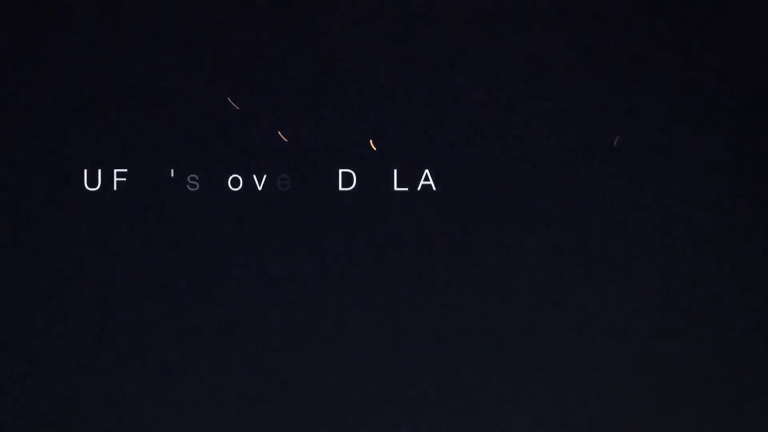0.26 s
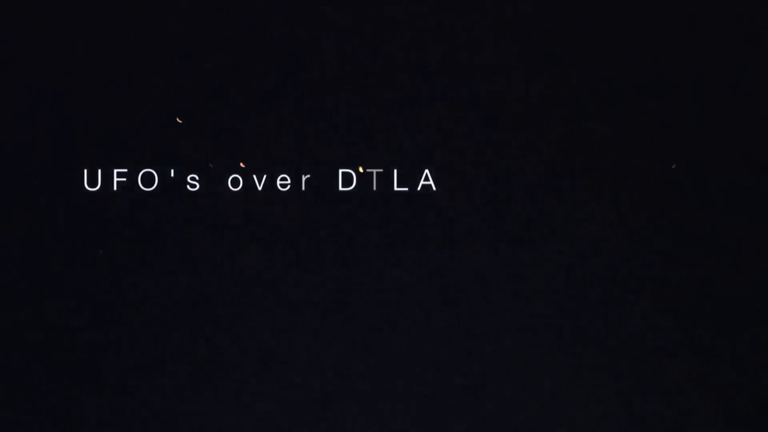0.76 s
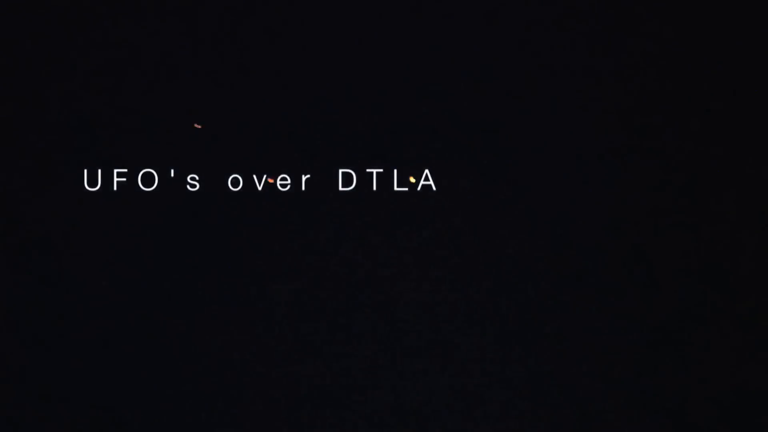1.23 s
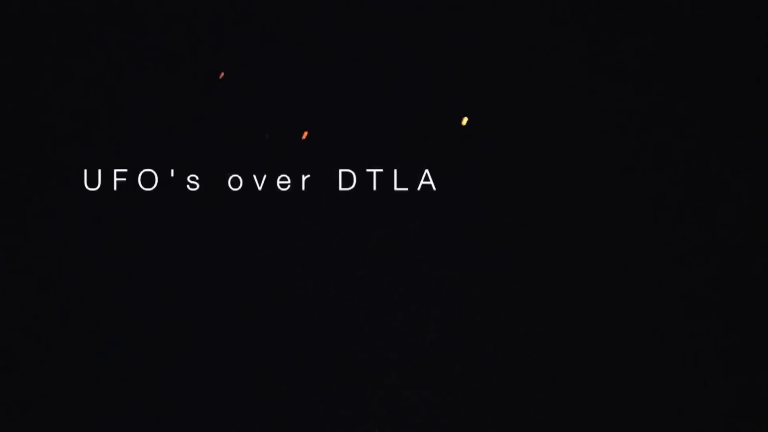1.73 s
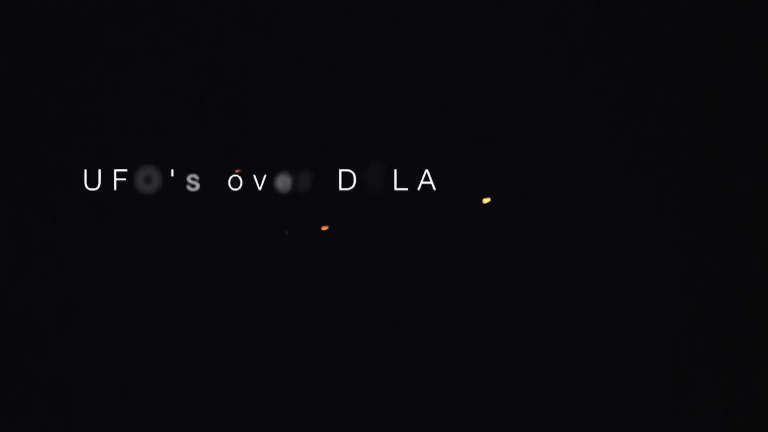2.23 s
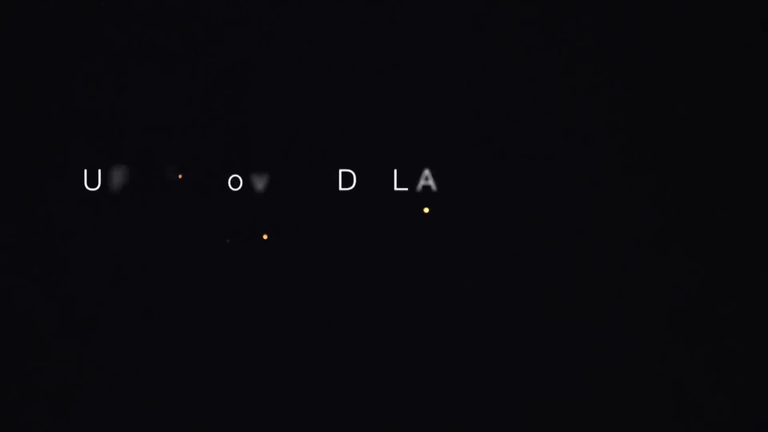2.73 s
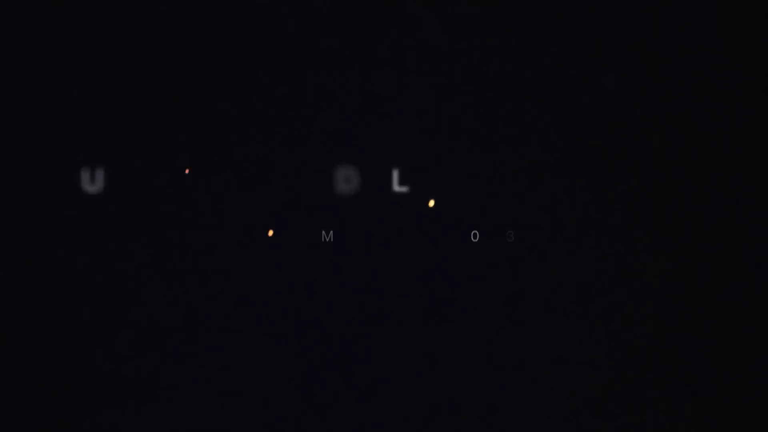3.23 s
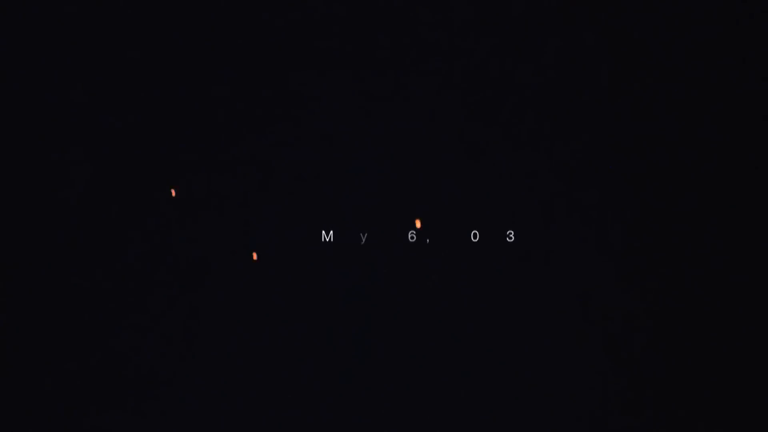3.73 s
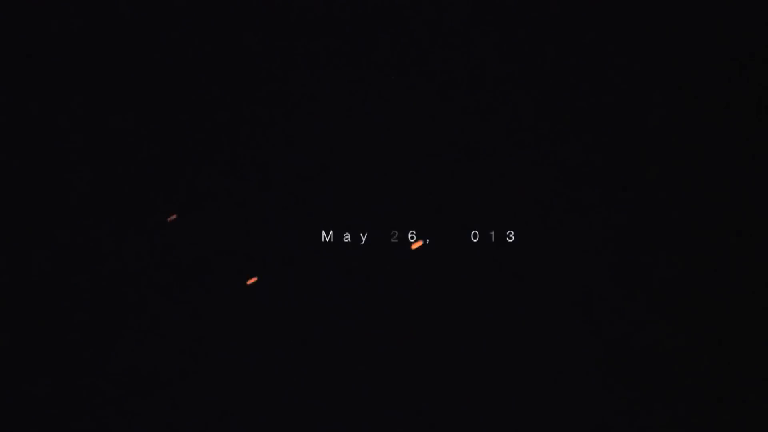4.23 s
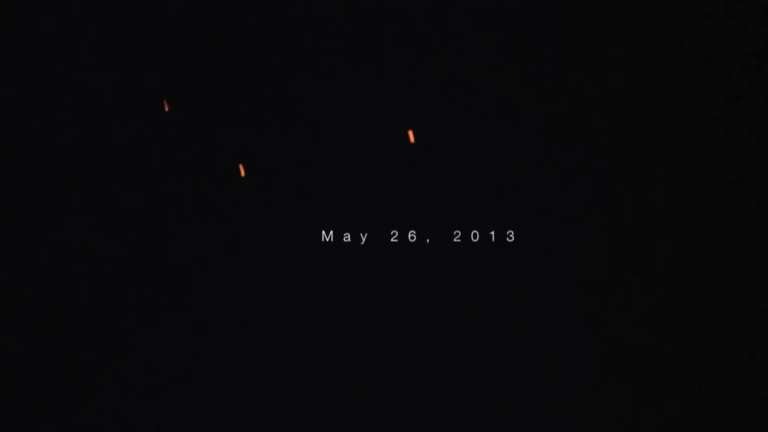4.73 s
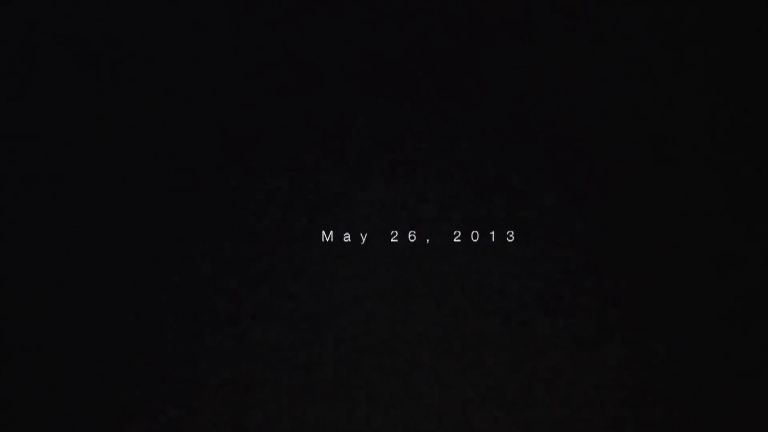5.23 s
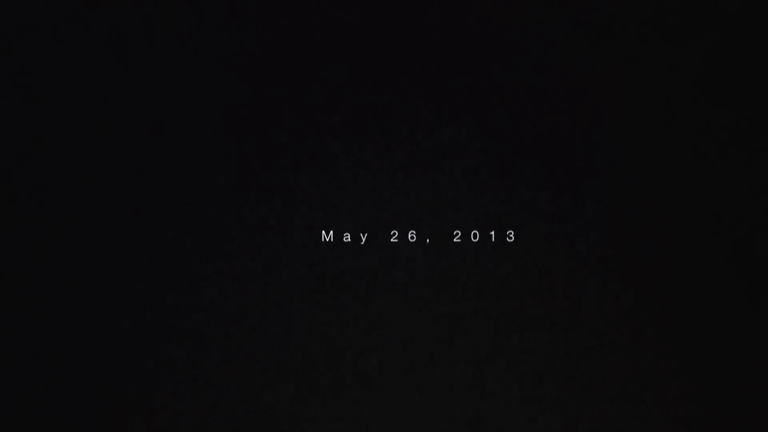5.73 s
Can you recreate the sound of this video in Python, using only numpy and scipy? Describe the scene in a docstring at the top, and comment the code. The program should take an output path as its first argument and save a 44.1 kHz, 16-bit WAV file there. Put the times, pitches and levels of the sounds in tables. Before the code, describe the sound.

An even outdoor wash of far traffic with a faint motor whine, handling thumps and sharp case ticks, cutting quickly to silence.

```python
"""Far city traffic at night, heard through a hand-held phone: shaped noise bands, engine notes and slow swells.
A motor hums and whines faintly nearby: sines that waver with its speed.
A hand rustles over the phone (grainy noise through cavities), bumps it (short pushes and a dull shudder),
and knocks and ticks its case (dying modes). At the end the sound fades quickly to silence."""
import sys
import numpy as np
from scipy import signal
from scipy.fft import rfft, irfft, next_fast_len
from scipy.io import wavfile
from scipy.ndimage import uniform_filter1d

SR = 44100
rng = np.random.default_rng(int(sys.argv[2]) if len(sys.argv) > 2 else 0)


def log_audio(samples):
    """Write samples as a 16-bit WAV file to the path given in sys.argv[1]."""
    # one column per channel
    frames = np.atleast_2d(samples).T
    # limit to full scale, then quantise
    limited = np.clip(frames, -1, 1)
    pcm = np.round(limited * 32767).astype(np.int16)
    wavfile.write(sys.argv[1], SR, pcm)


N = 263277
TIME_S = np.arange(N) / SR


def undb(db):
    """Amplitude factor of a level in dB."""
    return 10 ** (np.asarray(db) / 20)


def level(x, db):
    """Scales x by its RMS, so that unit RMS would stand at db."""
    return x * undb(db) / np.sqrt(np.mean(x ** 2))


def walk(rate_hz):
    """Random levels held 1 / rate_hz and slewed twice; spread near 1."""
    hold = int(SR / rate_hz)
    steps = np.repeat(rng.standard_normal(N // hold + 1), hold)
    return 1.3 * uniform_filter1d(uniform_filter1d(steps, hold), hold)[:N]


def resonance(x, hz, width_hz):
    """One resonant mode: a two-pole peak of unit gain."""
    return signal.lfilter(*signal.iirpeak(hz, hz / width_hz, fs=SR), x)


def double_resonance(x, hz, width_hz):
    """Two equal modes in series: steeper skirts."""
    return resonance(resonance(x, hz, width_hz), hz, width_hz)


def add(out, start_s, sound):
    """Mixes a short sound into out."""
    start = int(start_s * SR)
    out[start:start + len(sound)] += sound


def ring(hz, t60_s, rise_s):
    """One mode: linear rise, then exponential decay."""
    t = np.arange(int(2 * t60_s * SR)) / SR
    rise = np.minimum(t / rise_s, 1)
    decay = undb(-60 * np.maximum(t - rise_s, 0) / t60_s)
    return np.sin(2 * np.pi * hz * t) * rise * decay


def traffic(swell_db=0.29, flicker_db=0.48):
    """Countless far vehicles: octave bands of noise that swell together and flicker alone."""
    # Rumble, drone, roar, hiss. Each row: level at the start in dB, drift in dB per s.
    layer_levels = [(-33, -.5), (-30.5, 0.63), (-27.5, 0.1135), (-36, -0.13)]
    # Spectrum of the noise. Each row: frequency in Hz, density in dB per Hz relative within its layer.
    city = [(24, -11), (48, -7.5), (70, 0.5), (102, -6), (240, -2), (535, -8), (707, -6), (1800, -14),
            (2500, -16), (3600, -21.5), (5000, -29), (9500, -33.5), (10800, -37.5), (13500, -61)]
    # Edges between the four layers in Hz.
    edges_hz = [120, 480, 1920]
    size = next_fast_len(N)
    octave = np.log2(np.maximum(np.fft.rfftfreq(size, 1 / SR), 1))
    hz, density_db = np.transpose(city)
    spectrum_db = np.interp(octave, np.log2(hz), density_db, right=-90)
    noise = rfft(rng.standard_normal(size)) * undb(spectrum_db)
    layers = np.zeros((len(edges_hz) + 1, N))
    swell = swell_db * walk(5.8)
    for centre in np.log2(edges_hz[0]) + np.arange(-2.5, 8):
        share = np.clip(1 - np.abs(octave - centre), 0, 1)  # overlapping triangles
        band = irfft(noise * share, size)[:N] * undb(swell + flicker_db * walk(9))
        layers[np.searchsorted(edges_hz, 2 ** centre)] += band
    return sum(level(layer, db + drift_db_s * TIME_S)
               for layer, (db, drift_db_s) in zip(layers, layer_levels))


def drones():
    """Idling engines out of the rumble: each note a narrow, wavering band of noise."""
    # Each row: frequency in Hz, width in Hz, level in dB.
    engine_notes = [(39.7, 8, -43.5), (87.8, 8.4, -38.5), (138.7, 8.5, -38), (170.5, 24, -45.5),
                    (213.6, 7.2, -37.5), (231.2, 3.5, -40.5), (324, 16, -44.5), (698, 13, -43.5)]
    return sum(level(resonance(rng.standard_normal(N), hz, width_hz), db)
               for hz, width_hz, db in engine_notes)


def swells():
    """Noise bands that swell and fade: bands of the roar, and hiss near 2.4 and 3.6 kHz."""
    # Each row: peak in s, time to half power in s, centre in Hz, width of each resonance in Hz,
    # level at the peak in dB.
    swell_bands = [(0, .5, 3700, 1400, -45), (1.8, 1.5, 2400, 800, -41.5), (2.6, .4, 290, 120.6, -35.5),
                   (2.9, .6, 1108, 893, -33.5), (4.1, .7, 3600, 1400, -43)]
    out = np.zeros(N)
    for peak_s, half_s, hz, width_hz, db in swell_bands:
        band = level(double_resonance(rng.standard_normal(N), hz, width_hz), db)
        out += band / np.hypot(1, (TIME_S - peak_s) / half_s)
    return out


def motor(waver=.0004, beat_db=1.5, fade_start_s=3, fade_db_s=-4.5):
    """Fan hum and a thin whine with side tones about a shaft turn apart; one speed wavers all."""
    # Hum first, then the whine. Each row: frequency in Hz, level in dB.
    partials = [(119.5, -38), (2102, -52.5), (2160, -51), (2190, -51), (2218, -58), (2277, -47.5),
                (2307, -59.5), (2336, -52), (2373, -57), (2403, -57.5)]
    running_s = np.cumsum(1 + waver * walk(2.017)) / SR  # time stretched by the speed
    tones = []
    for hz, db in partials:
        amplitude = np.sqrt(2) * undb(db + beat_db * walk(1.7))
        tones.append(amplitude * np.sin(2 * np.pi * (hz * running_s + rng.random())))
    hum, *whine = tones
    return hum + sum(whine) * undb(fade_db_s * np.maximum(TIME_S - fade_start_s, 0))


def rustle(grain_db=1.5, drift_db=1.5):
    """Skin on the case: grainy friction noise in small cavities that ring more or less as the grip shifts."""
    # Each row: peak in s, peak level in dB at the tilt pivot, rise in ms, fall in ms,
    # brightness in dB per octave.
    strokes = [(.03, -47, 30, 250, -1), (.15, -44.5, 100, 170, -1), (.28, -37, 50, 50, -0.5),
               (.37, -41, 70, 150, .1), (.65, -42, 60, 150, 1.5), (.75, -44, 100, 60, .1),
               (.885, -43, 60, 90, .1), (1.19, -43.5, 100, 120, 0.5), (1.49, -45, 60, 60, -3),
               (3.35, -46, 20, 130, 1), (3.48, -44, 20, 60, -1.5), (3.8, -47, 430, 110, -1.5),
               (4.07, -41, 220, 250, 5), (4.235, -41, 40, 40, 3), (4.3, -41.5, 150, 20, 5),
               (5.125, -43.5, 36, 30, 1.5), (5.25, -45, 37, 30, 6)]
    # Each row: frequency in Hz, width of each resonance in Hz, relative gain in dB.
    cavity_modes = [(5500, 3900, -4), (7600, 910, -4), (9030, 1200, -1.8), (10250, 2200, -7),
                    (13100, 1200, -17.5), (14300, 1500, -24)]
    grip_db, grip_drift_db_s = -48.5, -2  # faint rubbing of the resting hand
    tilt_pivot_hz = 9000
    grain = undb(grain_db * walk(300))
    cavities = []
    for hz, width_hz, db in cavity_modes:
        gain = undb(db + drift_db * walk(5))
        cavities.append(gain * double_resonance(grain * rng.standard_normal(N), hz, width_hz))
    out = np.zeros(N)
    for (hz, _, _), cavity in zip(cavity_modes, cavities):
        power = undb(grip_db + grip_drift_db_s * TIME_S) ** 2
        for peak_s, db, rise_ms, fall_ms, tilt_db in strokes:
            corners_s = [peak_s - rise_ms / 1000, peak_s, peak_s + fall_ms / 1000]
            shape = np.interp(TIME_S, corners_s, [0, 1, 0])
            power = power + (undb(db + tilt_db * np.log2(hz / tilt_pivot_hz)) * shape) ** 2
        out += cavity * np.sqrt(power)
    return out / np.std(sum(cavities))


def bumps():
    """Soft bumps: each pushes the microphone, which resonates, and the body shudders dully."""
    # Each row: start in s, height in dB before the bass cut, push length in ms, direction +-1.
    pushes = [(2.471, -12.5, 2.8, -1), (2.672, -11.5, 2.1, -1), (2.781, -15.5, 3.4, 1),
              (2.9654, -7.5, 1.8, -1), (2.989, -12, 6.1, 1), (3.003, -16, 4.9, -1), (3.084, -10, 3.5, 1),
              (3.092, -13, 2.9, -1), (3.222, -16.5, 3.5, -1), (3.406, -12, 3.5, 1), (3.449, -8.5, 4.3, -1)]
    cut_hz, mode_hz, mode_width_hz = 85, 148, 91
    shake_hz, shake_width_hz, shake_t60_s = 240, 250, 0.23
    shake_db = -15.5  # relative to the push height
    push, shake = np.zeros(N), np.zeros(N)
    decay_db = -60 * np.arange(int(shake_t60_s * SR)) / SR / shake_t60_s
    for start_s, db, length_ms, sign in pushes:
        add(push, start_s, np.sign(sign) * undb(db) * np.hanning(int(length_ms * SR / 1000)))
        add(shake, start_s, undb(db + shake_db + decay_db))
    push = signal.sosfilt(signal.butter(1, cut_hz, "high", fs=SR, output="sos"), push)
    shudder = level(double_resonance(rng.standard_normal(N), shake_hz, shake_width_hz), 0)
    return push + resonance(push, mode_hz, mode_width_hz) + shake * shudder


def ticks():
    """Ticks of the case: each rings all its short, high modes."""
    # Each row: start in s, level in dB.
    hits = [(3.473, -24), (4.8576, -14.5), (4.8796, -16.5), (5.212, -14.5)]
    # Each row: mode frequency in Hz, relative level in dB, t60 in s.
    case_modes = [(2960, 0, 0.0067), (3750, -9, 0.005), (7400, -24.5, .006), (8700, -20, 0.0058),
                  (10050, -23, .007), (13500, -36, .003)]
    out = np.zeros(N)
    for start_s, db in hits:
        for hz, mode_db, t60_s in case_modes:
            add(out, start_s, undb(db + mode_db) * ring(hz, t60_s, rise_s=0.00073))
    return out


def knocks():
    """Hollow knocks: a low mode and a weaker overtone die together."""
    # Each row: start in s, level of the low mode in dB, pitch in Hz, rise in ms.
    hits = [(3.572, -16.5, 766, 14), (3.868, -10.5, 825, 3), (4.065, -29, 845, 4)]
    t60_s, overtone_ratio, overtone_db = .055, 1.3, -8
    out = np.zeros(N)
    for start_s, db, hz, rise_ms in hits:
        rise_s = rise_ms / 1000
        add(out, start_s, undb(db) * ring(hz, t60_s, rise_s))
        add(out, start_s, undb(db + overtone_db) * ring(overtone_ratio * hz, t60_s, rise_s))
    return out


def scene():
    """Sums all sources into one channel."""
    street = traffic() + drones() + swells()
    handling = rustle() + bumps() + ticks() + knocks()
    return (street + motor() + handling)[None]


def record(dry):
    """The phone adds its own hiss and cuts deep bass and the top; the sound then fades to silence."""
    self_noise_db, bass_hz, top_hz = -62.5, 32, 15730
    fade_start_s, fade_end_s, fade_bend = 5.255, 5.352, 1.07
    x = dry + level(rng.standard_normal(N), self_noise_db)
    x = signal.sosfilt(signal.butter(4, bass_hz, "high", fs=SR, output="sos"), x)
    x = signal.sosfilt(signal.ellip(14, .3, 60, top_hz, fs=SR, output="sos"), x)
    left = np.clip((fade_end_s - TIME_S) / (fade_end_s - fade_start_s), 0, 1)
    return x * left ** fade_bend


dry = scene()
out = record(dry)
log_audio(out)
```